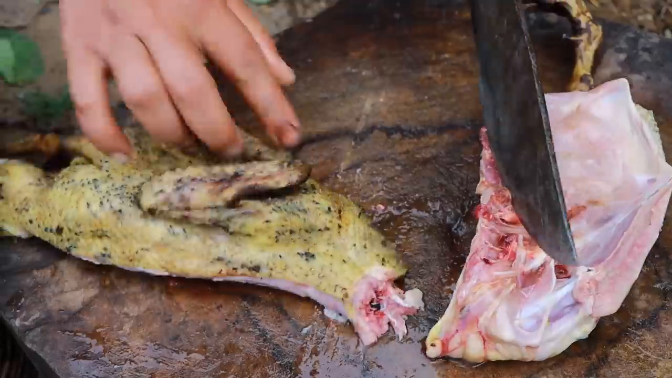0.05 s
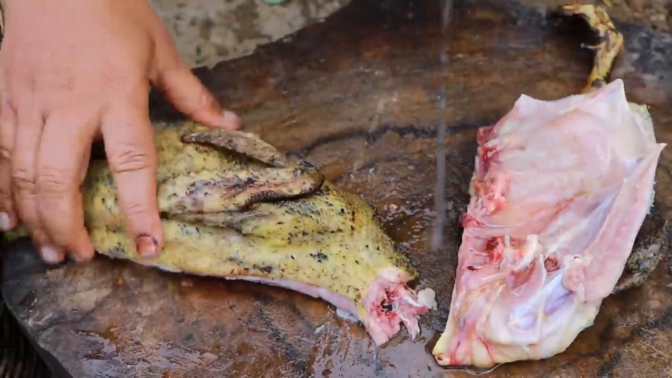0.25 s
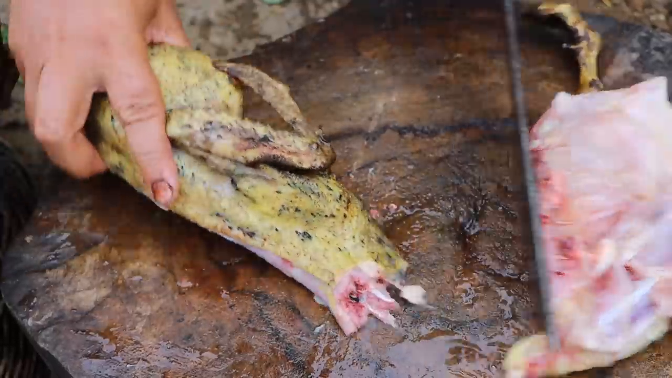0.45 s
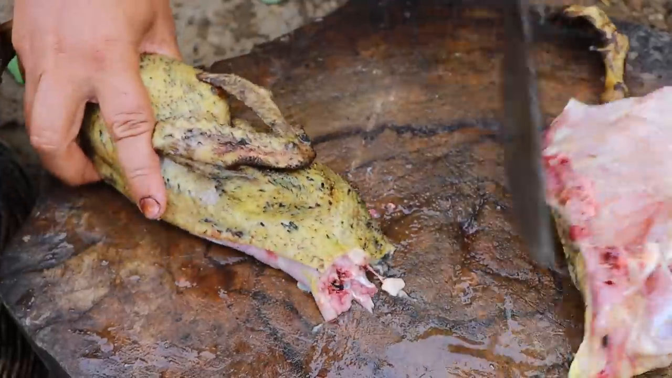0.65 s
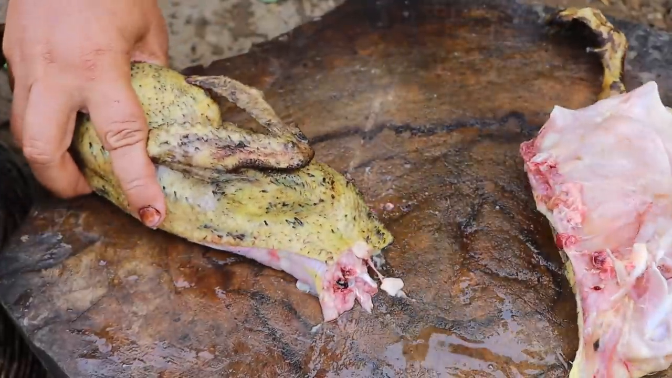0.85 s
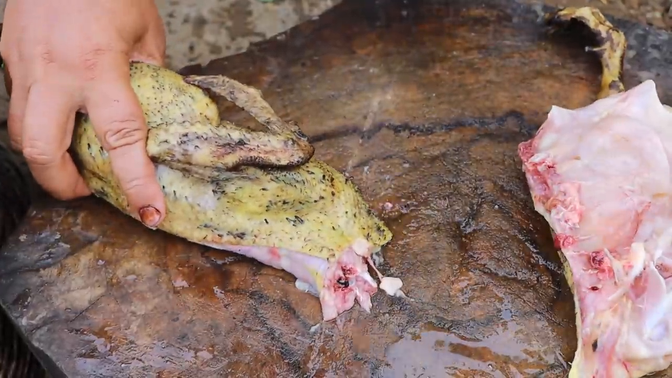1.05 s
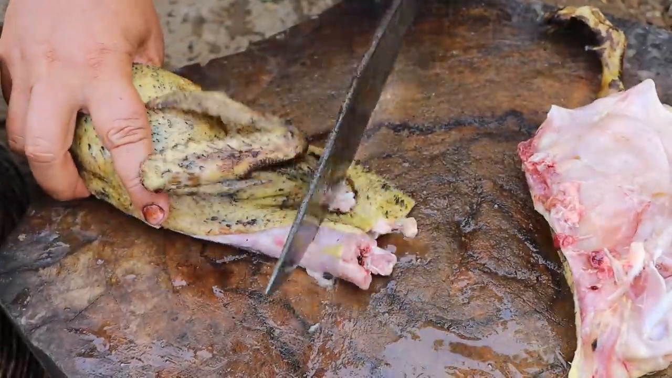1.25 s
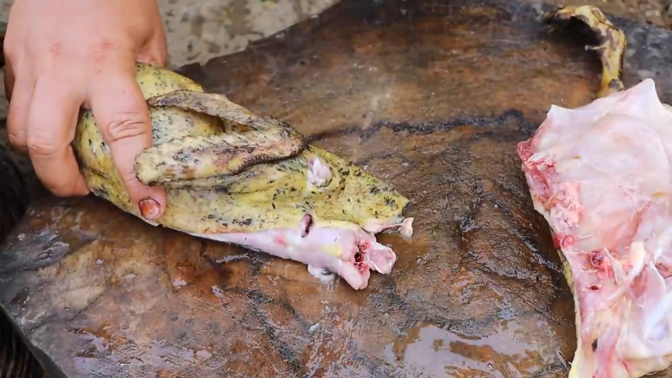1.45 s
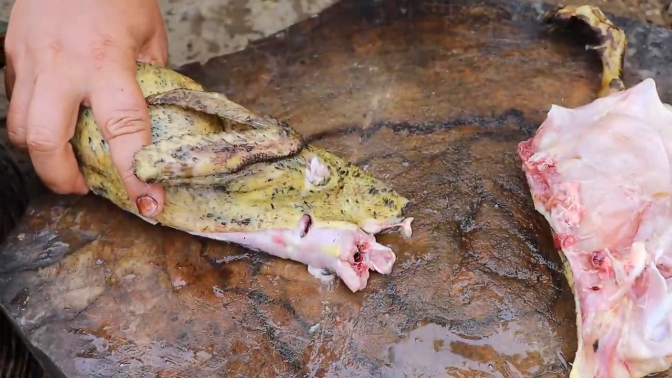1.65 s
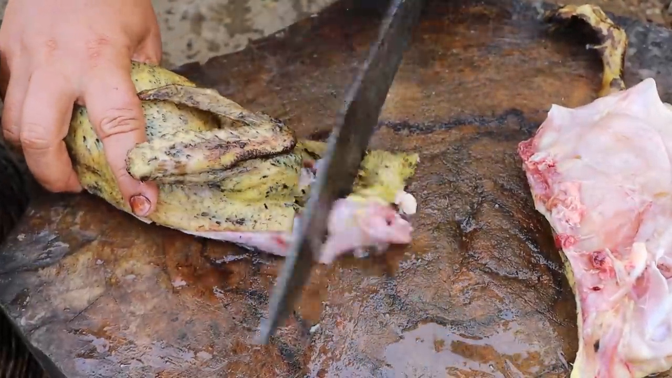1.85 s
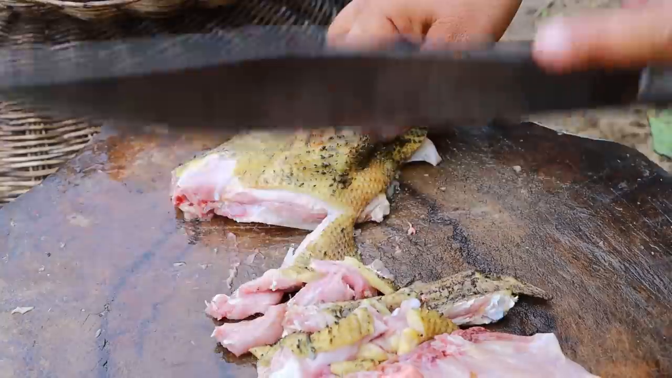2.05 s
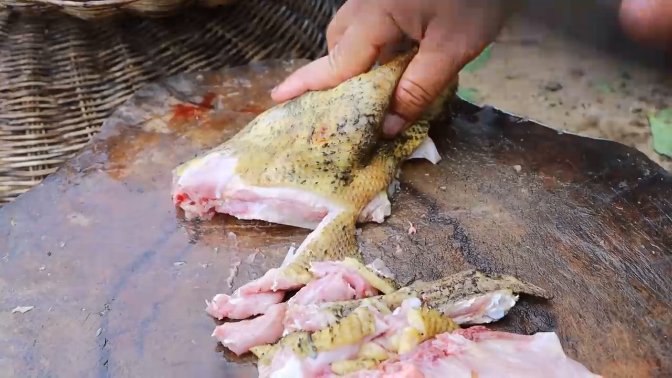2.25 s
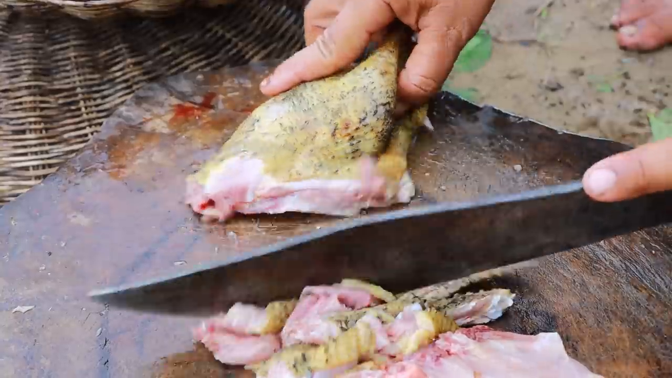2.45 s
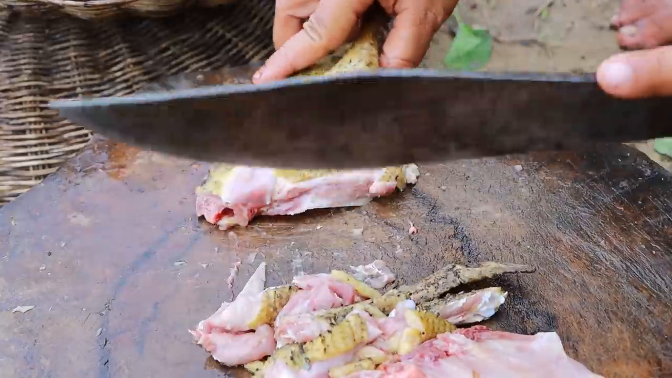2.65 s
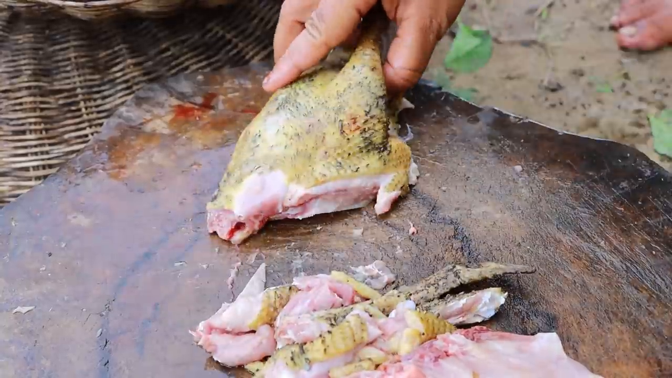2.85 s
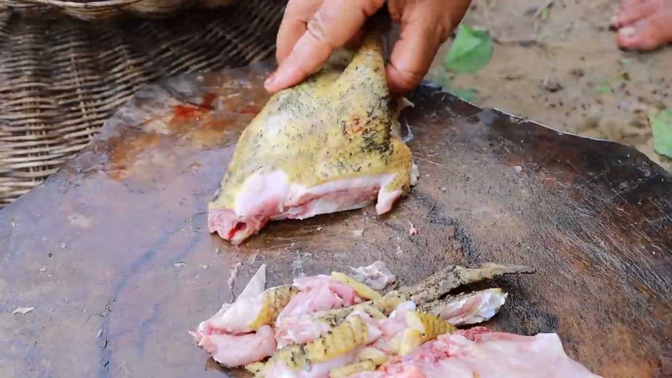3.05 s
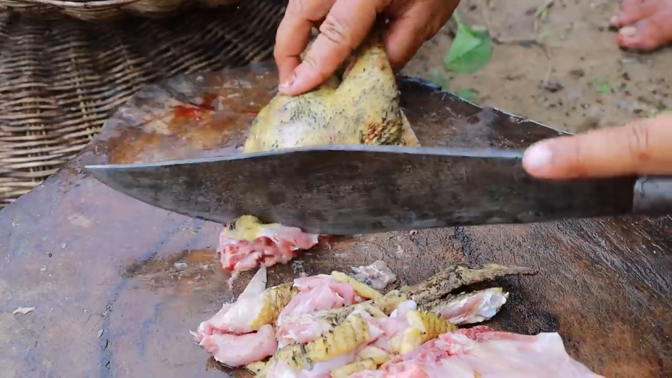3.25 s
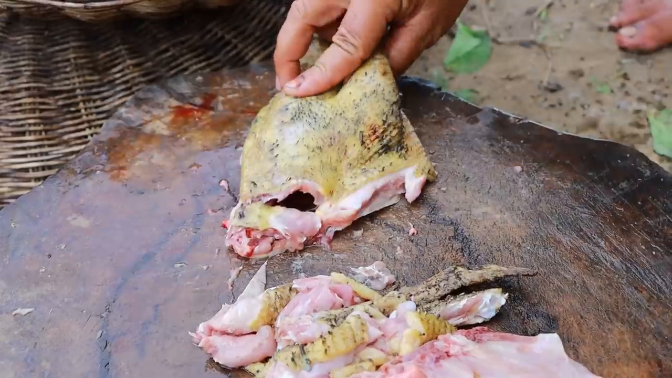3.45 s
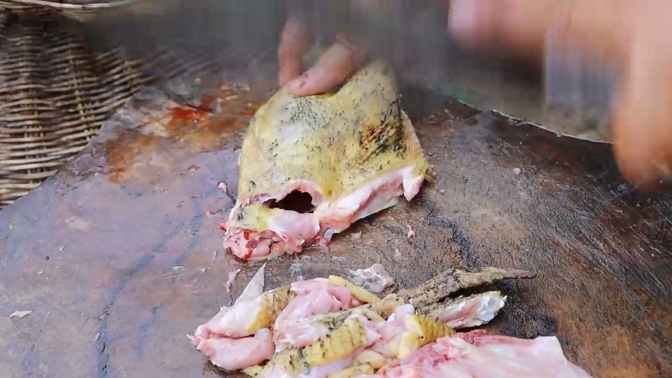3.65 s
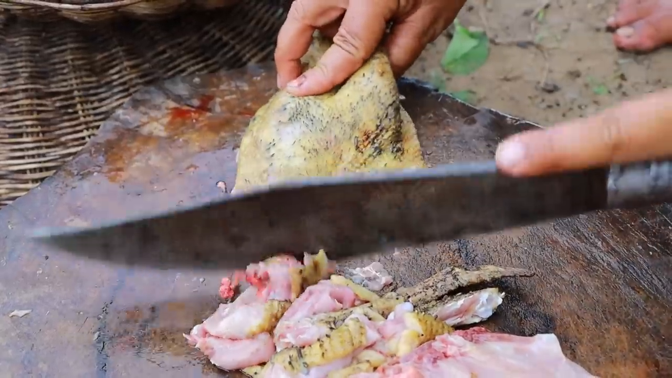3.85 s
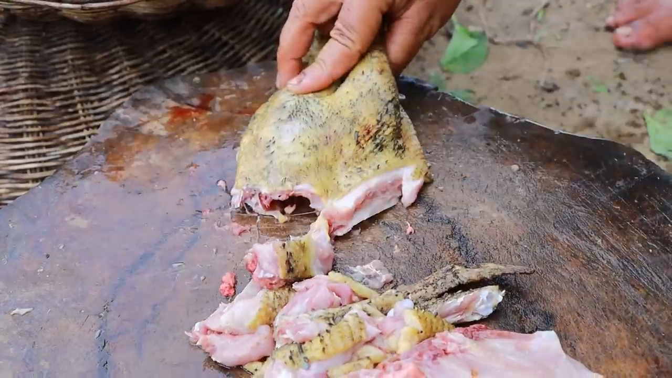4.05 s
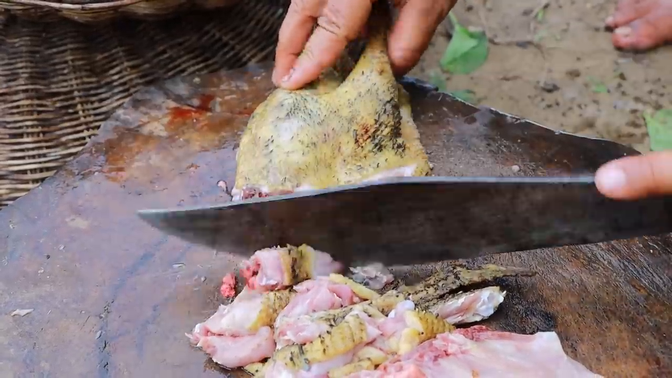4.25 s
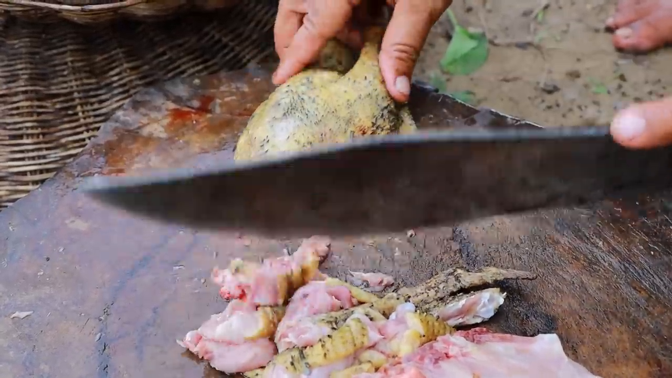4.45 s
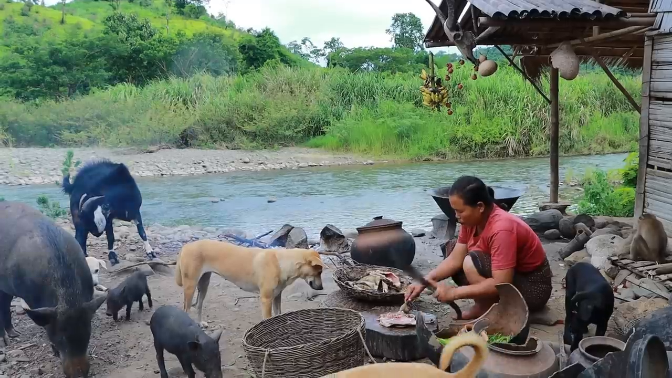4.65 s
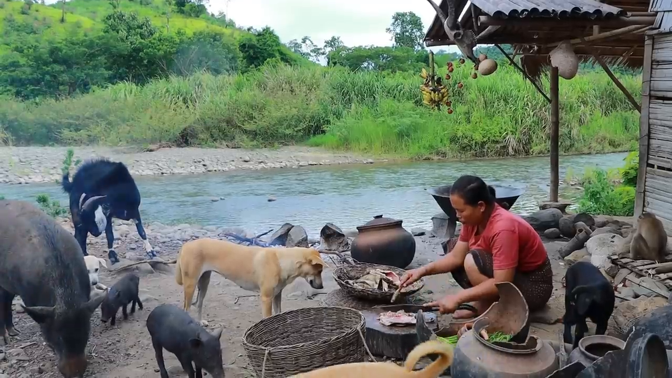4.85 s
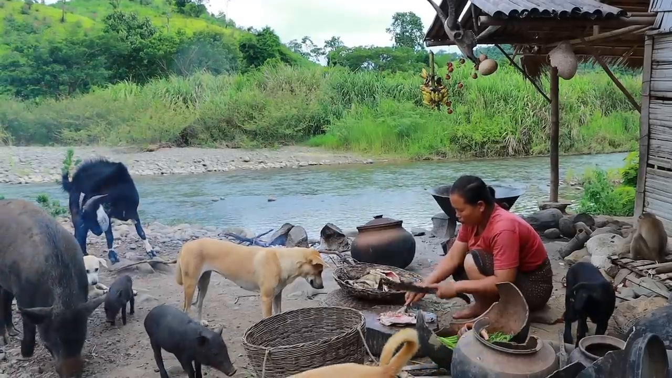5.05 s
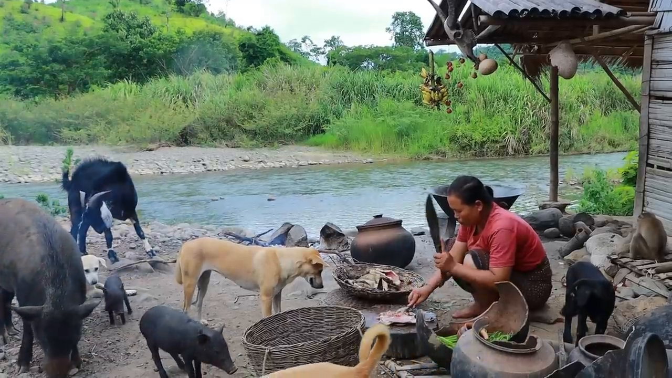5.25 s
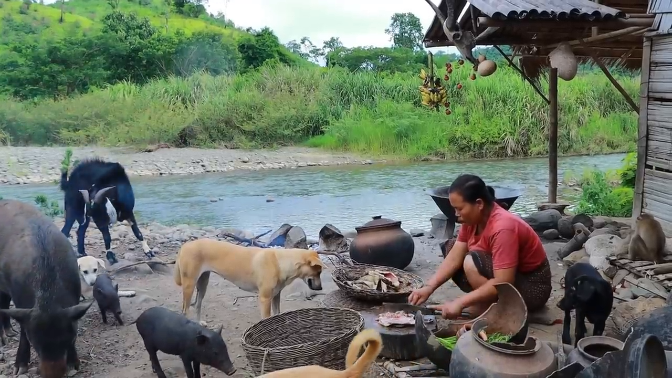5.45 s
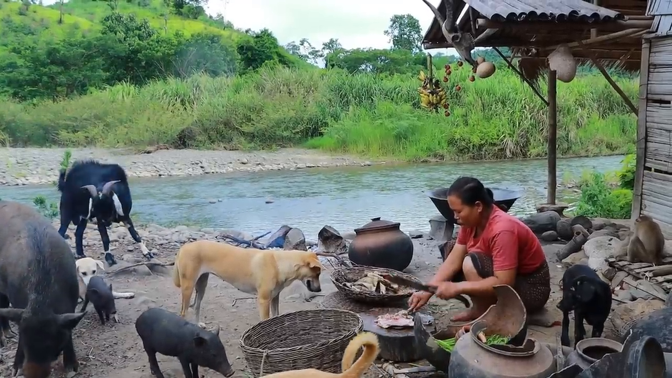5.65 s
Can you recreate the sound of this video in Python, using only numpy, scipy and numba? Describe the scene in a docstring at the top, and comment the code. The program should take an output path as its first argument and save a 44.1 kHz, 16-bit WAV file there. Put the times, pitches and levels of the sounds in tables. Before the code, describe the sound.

Irregular blows of a long blade split bone on a wooden block, growing loud and overloaded, above quiet river wash and thin insect chirping.

```python
"""Chopping meat beside a river

A long knife chops meat and bone on a thick wooden block: each blow is a noise crack with dying wood and blade modes.
Short tones and bursts make the ticks; swelling friction noise makes the rustle of wet meat.
Wavering near-sines whine, moan and grunt; insects throb and chirp over a river of patchy noise.
Loud blows overload the microphone, then gain control ducks everything; the sound drops out once, briefly."""
import sys
import numpy as np
from scipy import signal
from scipy.fft import rfft, irfft
from scipy.io import wavfile
from scipy.ndimage import uniform_filter1d
from numba import njit

SR = 44100
rng = np.random.default_rng(int(sys.argv[2]) if len(sys.argv) > 2 else 0)


def generate_wav(sig):
    """Save sig (samples, or channels by samples) to the path in sys.argv[1] as 16-bit PCM at SR."""
    pcm = np.round(np.clip(np.atleast_2d(sig).T, -1, 1) * 32767).astype(np.int16)
    wavfile.write(sys.argv[1], SR, pcm)


N = 251811


def gain_of(db):
    """Decibels to amplitude gain."""
    return 10 ** (np.asarray(db) / 20)


def evened(x):
    """Scales to rms 1."""
    return x / np.sqrt(np.mean(x ** 2) + 1e-20)


def read(points, hz):
    """Interpolates a spectrum in dB on a log-frequency axis."""
    point_hz, point_db = np.transpose(points)
    return np.interp(np.log(hz + 1), np.log(point_hz + 1), point_db)


def add(mix, start_s, sound):
    """Mixes a sound in at start_s, cut off at the end of the mix."""
    part = mix[round(start_s * SR):][:len(sound)]
    part += sound[:len(part)]


def resonate(x, hz, width_hz):
    """Resonance of peak gain 1: shifts hz down to zero, smooths, shifts back."""
    carrier = np.exp(2j * np.pi * np.cumsum(hz * np.ones(len(x))) / SR)
    pole = np.exp(-np.pi * abs(width_hz) / SR)
    smoothed = signal.lfilter([1 - pole], [1, -pole], x / carrier)
    return 2 * (carrier * smoothed).real


def noise(colour, size, patchy_db, flicker_db):
    """Random short-time spectra of one colour, broken up by patches and wideband flicker; rms 1."""
    hop = size // 4
    frames, hz = N // hop + 5, np.fft.rfftfreq(size, 1 / SR)
    real, imag, patches = rng.standard_normal((frames, len(hz), 3)).T
    patches = uniform_filter1d(patches, size=size // 80, axis=0)  # over frequency
    patches = evened(uniform_filter1d(patches, size=7000 // size, axis=1))  # over time
    flicker = evened(uniform_filter1d(rng.standard_normal(frames), size=2))
    field_db = read(colour, hz)[:, None] + patchy_db * patches + flicker_db * flicker
    spectra = (real + 1j * imag) * gain_of(field_db)
    return evened(signal.istft(spectra, nperseg=size, noverlap=size - hop)[1][:N])


def chops():
    """Bone splits in a noise burst with a short wet tail; block and blade ring on; the ground gives a push."""
    # Crack spectrum. Each row: frequency in Hz, relative density in dB.
    crack_colour = [(120, -21), (300, 2.5), (850, 2), (1900, -2), (3500, -0.5), (5900, -6), (7400, -15),
                    (8500, -10.5), (12000, -24), (16000, -24.5)]
    # Modes of block and blade. Each row: frequency in Hz, relative level in dB,
    # 60 dB decay time in s before the blow's ring length factor.
    wood_low = [(366.4, -1.5, 0.034), (455, -6, 0.066), (584, 3.5, 0.02)]
    wood_main = [(746, -2, 0.11), (940, 0.5, 0.025), (1056, -20, 0.019)]
    wood_upper = [(802.3, -0.5, 0.16), (1570, -0.5, 0.038)]
    blade_bend = [(1757, 0, .04), (1863, 0, .22), (2643, -16, .09), (2988, -13, .08), (3185, 0, .065),
                  (4172, -15, .08), (4710, -17, .08)]
    blade_edge = [(5658, 0, .16), (5798, -2, .09), (9555, -22, .15)]
    blade_tip = [(6019, 0, .11), (6150, -6, .06), (8240, -8, .17), (10500, -24, .12), (12620, -16, .09),
                 (13780, -13, .07)]
    bodies = (wood_low, wood_main, wood_upper, blade_bend, blade_edge, blade_tip)

    out, t = np.zeros(N), np.arange(SR // 4) / SR
    hz = np.fft.rfftfreq(len(t), 1 / SR)
    octaves = np.log2((hz + 100) / 3000)
    push = np.sin(2 * np.pi * 35 * t) * np.exp(-t / 0.0088)
    bite = 1 - np.exp(-(t / 0.00078) ** 2)  # the edge takes a moment to sink in
    load = 1 - np.exp(-t / 0.0008)  # the force reaches the block through the meat
    for s, crack_db, ms, tilt_db, push_db, *rings_db, length in strikes():
        colour_db = read(crack_colour, hz) + tilt_db * octaves
        burst = rng.standard_normal(len(t))
        burst = evened(irfft(rfft(burst) * gain_of(colour_db), len(t)))
        tail = resonate(resonate(burst, 1300, 4200), 1400, 4000)
        tail = tail * gain_of(-27.5) * np.exp(-t / 0.013)
        split = 1000 * t / ms
        swell = 1.27 * np.sqrt(split) * np.exp(-split ** 2)  # rises as the bone gives way
        crack = burst * swell + tail
        rings = sum(gain_of(db) * ring(modes, t, length) for db, modes in zip(rings_db, bodies))
        loaded = load * (gain_of(push_db) * push + rings)
        add(out, s - .0006, bite * (gain_of(crack_db) * crack + loaded))
    return out


def strikes():
    """Every blow, then its rebound: fainter, duller, with a weaker noise burst, mostly wood."""
    # Blows of the blade. Each row: start in seconds, crack level in dB, crack time constant in ms,
    # crack tilt in dB per octave, push in dB, low, main and upper wood in dB, blade bending, edge and tip in dB,
    # ring length as a factor (meat on wood and steel damps it), rebound delay in ms,
    # rebound level in dB against the blow.
    blows = [(0.044, -13.5, 13, -2.5, -51, -11, -22, -32, -28, -50, -50, 0.44, 62, -8),
             (0.461, -11.5, 5.1, -12, -47, -6.5, -14, -22.5, -44, -55, -56, 1, 39, -12),
             (1.1928, -2, 7, 1.5, -32, -21, -3, -5.5, -25.5, -53, -40, 0.51, 127, -15),
             (1.8171, 3.5, 3.34, -1, -15, -4, -1, -10.5, -24.5, -20.5, -45, 1, 49, -1.5),
             (2.3818, 2.5, 3.45, -3, -21.5, 5, 1, -15, -23, -29, -38, 0.73, 28, -12),
             (3.203, 4.5, 3.36, 0, -42, .5, 0.5, -3, -18.5, -28, -45.5, 0.81, 38, -21),
             (3.7733, 5.5, 3.68, 0, -23, -4, -5.5, -13, -15.5, -36, -19, 1., 33.6, -4),
             (4.298, 7, 2.5, -.5, -14, -3.5, -3, -13, -14.5, -33.5, -35, 1., 34, -4),
             (4.832, -1, 2.7, -2.5, -26, -6.5, -10.5, -10, -18.5, -27, -42, 0.7, 37, -6.5),
             (5.5552, -3, 5.06, 1, -48, -6, -13, -4.5, -19, -39, -50, 0.58, 36, -7.5)]
    for s, crack_db, ms, tilt_db, push_db, *rings_db, length, delay_ms, back_db in blows:
        wood_db, steel_db = rings_db[:3], rings_db[3:]
        yield s, crack_db, ms, tilt_db, push_db, *rings_db, length
        back_wood_db = [db + back_db for db in wood_db]
        back_steel_db = [db + back_db - 13 for db in steel_db]
        yield (s + delay_ms / 1000, crack_db + back_db - 13.5, 2.6, tilt_db - 4,
               push_db + back_db - 19, *back_wood_db, *back_steel_db, length * 0.58)


def ring(modes, t, length):
    """Struck modes: dying sines; neighbouring modes start in opposite directions."""
    total = np.zeros(len(t))
    for k, (hz, db, t60_s) in enumerate(modes):
        decay = gain_of(db - 60 * t / (t60_s * length))
        total += (-1) ** k * decay * np.sin(2 * np.pi * hz * t)
    return total


def ticks():
    """Ticks of blade, bone and wet meat: dying tones when clean, noise around the pitch when rough."""
    # Clearest ticks, knocks and tings. Each row: start in seconds, level in dB before the envelope,
    # pitch in Hz, decay time constant in ms.
    clear_ticks = [(.048, -4.5, 2000, 2.2), (.058, -14.5, 4460, 4.7), (.065, -11.5, 1260, 4.2),
                   (.0849, -9, 920, 4.4), (0.1, -17.5, 8370, 1.9), (.101, -14, 3000, 3),
                   (.501, -24.5, 5500, 6), (.538, -18.5, 3280, 3.2), (.594, -21.5, 1586, 7.3),
                   (.695, -28, 3370, 9), (1.02, -15, 740, 2), (1.055, -15.5, 870, 2.1),
                   (1.319, -13.5, 5500, 4.6), (1.318, -17.5, 9250, 3.4), (1.345, -28, 9150, 5),
                   (1.372, -30, 5330, 19), (1.391, -25, 4240, 8.2), (1.394, -39, 5960, 50),
                   (2.002, -26, 3190, 6.1), (2.036, -21.5, 4160, 4.1), (2.085, -43, 13800, 22),
                   (2.49, -27, 9000, 2), (2.543, -29, 3600, 5), (2.626, -20, 5500, 1.3),
                   (3.413, -22.5, 2640, 15), (3.408, -39, 10500, 19), (3.413, -29.5, 8320, 10),
                   (3.424, -41, 12620, 13), (3.458, -28, 4170, 3.1), (4.243, -30.5, 5770, 4.6),
                   (4.872, -16, 1990, 8), (4.908, -24, 8500, 1), (4.966, -22, 10000, .8),
                   (5.036, -23, 8000, 1.1), (5.074, -20, 8500, 1.1), (5.125, -24, 3720, 8),
                   (5.178, -21.5, 3340, 5.7), (5.375, -18.5, 1510, 2.4)]
    # Ranges of the fainter random ticks: lowest and highest pitch in Hz; shortest and longest decay in ms.
    small_hz = (3000, 12000)
    small_ms = (.3, 1.2)
    small_per_s, small_db, small_spread_db = 14, -36, 4
    max_rough, half_rough_ms = 0.61, 6.7  # roughness of the shortest ticks; length that halves it

    out, t = np.zeros(N), np.arange(8000) / SR
    when, size, pitch, span = rng.random((110, 4)).T
    start_s = np.cumsum(-np.log(when)) / small_per_s
    level_db = small_db - small_spread_db * np.log(size)
    pitch_hz = small_hz[0] * (small_hz[1] / small_hz[0]) ** pitch
    decay_ms = small_ms[0] + (small_ms[1] - small_ms[0]) * span
    onset = 1 - np.exp(-t / 0.0003)
    for s, db, hz, ms in [*zip(start_s, level_db, pitch_hz, decay_ms), *clear_ticks]:
        rough = np.clip(max_rough / (1 + ms / half_rough_ms), 0, 1)
        tone = np.sin(2 * np.pi * hz * t)
        burst = evened(resonate(rng.standard_normal(len(t)), hz, hz * rough))
        tick = (1 - rough) * tone + rough * burst
        add(out, s, gain_of(db) * tick * np.exp(-1000 * t / ms) * onset)
    return out


def rustle():
    """Meat dragged over wet wood: flickering friction noise, dull to bright, in bell-curve swells."""
    # Friction spectra. Each row: frequency in Hz, relative density in dB.
    dull_colour = [(300, -24.5), (800, 10), (2500, 9.5), (4000, 5.5), (7000, -13.5), (16000, -26.5)]
    bright_colour = [(300, -18), (1000, -0.5), (3500, 3), (6000, 0.5), (9000, -10.5), (16000, -15)]
    # Drags. Each row: loudest moment in seconds, rise in s, fall in s, level in dB, brightness 0-1.
    drags = [(.09, 0.054, 0.18, -36, 0.58), (.52, 0.29, 0.34, -33, 0.19), (.92, 0.065, 0.084, -38.5, 0.55),
             (1.15, 0.24, 0.16, -42, 0.1), (1.33, 0.065, 0.12, -33, 0.4), (1.6, 0.26, 0.42, -41.5, 0.23),
             (2.03, 0.071, 0.15, -40.5, 0.8), (2.3, 0.11, 0.086, -41.5, 0.75), (2.99, 0.078, 0.12, -41, 1),
             (3.17, 0.12, .1, -41.5, 0.6), (4.71, 0.072, 0.11, -37, 0.76), (4.97, 0.1, .1, -38.5, 0.97),
             (5.15, .17, 0.12, -32.5, 0.76), (5.7, 0.2, .1, -31, 0.45)]
    t, out = np.arange(N) / SR, np.zeros(N)
    dull = noise(dull_colour, size=512, patchy_db=2.0, flicker_db=3.0)
    bright = noise(bright_colour, size=256, patchy_db=1.5, flicker_db=3.2)
    for s, rise_s, fall_s, level_db, brightness in drags:
        share = np.clip(brightness, 0, 1)
        swell = np.exp(-2 * ((t - s) / np.where(t < s, rise_s, fall_s)) ** 2)
        friction = np.sqrt(1 - share) * dull + np.sqrt(share) * bright
        out += gain_of(level_db) * swell * friction
    return out


def animals():
    """A thin whine, a faint wavering moan and a short, low, broken grunt."""
    # Calls. Each row: time in seconds, pitch in Hz, level in dB.
    whine = [(.2, 823, -27), (.235, 830, -35.5), (.33, 813, -33.5), (.42, 801, -35), (.46, 790, -46)]
    moan = [(2.43, 930, -32), (2.5, 980, -33), (2.59, 1017, -39)]
    grunt = [(2.28, 375, -40.5), (2.324, 346, -28), (2.36, 320, -44)]
    out = np.zeros(N)
    add(out, *call(whine, wavering=0.013, breaking=0.26))
    add(out, *call(moan, wavering=.05, breaking=0.53))
    add(out, *call(grunt, wavering=0.073, breaking=0.86))
    return out


def call(rows, wavering, breaking):
    """Start and sound of a near-sine animal call whose pitch wavers and whose level breaks up."""
    s, hz, level_db = np.transpose(rows)
    t = np.arange(s[0], s[-1], 1 / SR)
    drift, flutter = (evened(uniform_filter1d(n, size=400)) for n in rng.standard_normal((2, len(t))))
    cycles = np.cumsum(np.interp(t, s, hz) * (1 + wavering * drift)) / SR
    voice = np.sqrt(2) * np.sin(2 * np.pi * cycles) * (1 + breaking * flutter)
    fade = signal.windows.tukey(len(t), .2)
    return s[0], gain_of(np.interp(t, s, level_db)) * voice * fade


def cricket():
    """A clean high tone cut into quick, nearly even chirps of uneven strength."""
    tone_hz, chirps_per_s, sharpness, base_db = 7150, 46.2, 1.8, -68.5  # stepped_gain adds to base_db
    pace, strength, pitch = (evened(uniform_filter1d(n, size=3000)) for n in rng.standard_normal((3, N)))
    chirp_cycles = np.cumsum(chirps_per_s * (1 + .02 * pace)) / SR
    chirps = (.5 + .5 * np.cos(2 * np.pi * chirp_cycles)) ** sharpness
    tone = np.sin(2 * np.pi * np.cumsum(tone_hz * (1 + .004 * pitch)) / SR)
    return gain_of(base_db + 1.8 * strength) * stepped_gain(column=2) * evened(chirps * tone)


def insects():
    """Insects as narrow resonant hiss that throbs."""
    # Each row: centre in Hz, width in Hz of each of two resonances, throbs per s,
    # base level in dB, to which stepped_gain adds.
    insect_rows = [(8380, 700, 92, -68)]
    out, t = np.zeros(N), np.arange(N) / SR
    for hz, width_hz, throbs_per_s, base_db in insect_rows:
        throb = .5 + (.5 + .5 * np.cos(2 * np.pi * throbs_per_s * t)) ** 2
        hiss = resonate(resonate(rng.standard_normal(N), hz, width_hz), hz, width_hz)
        out += gain_of(base_db) * stepped_gain(column=2) * evened(hiss * throb)
    return out


def river():
    """A wide noise wash with drifting patches."""
    # River spectrum. Each row: frequency in Hz, relative density in dB.
    river_colour = [(12, -31.5), (20, -1), (49, -16.5), (72, -1), (154, -5.5), (270, 2), (301, 0.5),
                    (660, -2), (849, 3), (1480, -9), (3440, -8.5), (4300, -15), (8410, -26), (13900, -35.5),
                    (16000, -43.5)]
    return noise(river_colour, size=2048, patchy_db=1.5, flicker_db=1.15) * stepped_gain(column=1)


def stepped_gain(column):
    """Background gain that jumps at set times."""
    # Each row: start in seconds, river level in dB, insect and cricket boost in dB.
    level_steps = [(0, -35.5, 0), (2.0, -35.5, 8), (4.55, -34, 12.5)]
    rows = np.array(level_steps)
    step = np.searchsorted(rows[1:, 0], np.arange(N) / SR)
    return gain_of(rows[step, column])


def scene():
    """All sources, one microphone."""
    return (chops() + ticks() + rustle() + animals() + cricket() + insects() + river())[None]


@njit
def follow(over_db, rise, fall):
    """A lag that rises and falls at different speeds, given as fractions per sample."""
    out, state = np.zeros(len(over_db)), 0.
    for i in range(len(over_db)):
        state += (over_db[i] - state) * (rise if over_db[i] > state else fall)
        out[i] = state
    return out


def record(dry):
    """Late, slowly recovering gain control lets loud blows clip first; then the dropout and the low-pass."""
    # Silence: from and to, in seconds.
    dropout_s = (4.5265, 4.5595)
    t = np.arange(N) / SR
    power = signal.lfilter([1 / 900], [1, 1 / 900 - 1], dry[0] ** 2)
    over_db = np.maximum(10 * np.log10(power + 1e-12) + 18, 0)  # threshold -18 dB
    held_db = follow(over_db, 1 / (0.016 * SR), 1 / (.07 * SR))
    duck_db = 3.38 * follow(held_db, 1 / (0.042 * SR), 1 / (0.032 * SR))
    late_db = np.interp(t - .005, t, duck_db)
    clipped = np.clip(dry / gain_of(late_db), -1, 1)
    gated = clipped * ((t < dropout_s[0]) | (t > dropout_s[1]))
    low_pass = signal.firwin(255, 16100, window=("kaiser", 8), fs=SR)  # cutoff in Hz
    return signal.oaconvolve(gated, low_pass[None], "same")


dry = scene()
out = record(dry)
generate_wav(out)
```